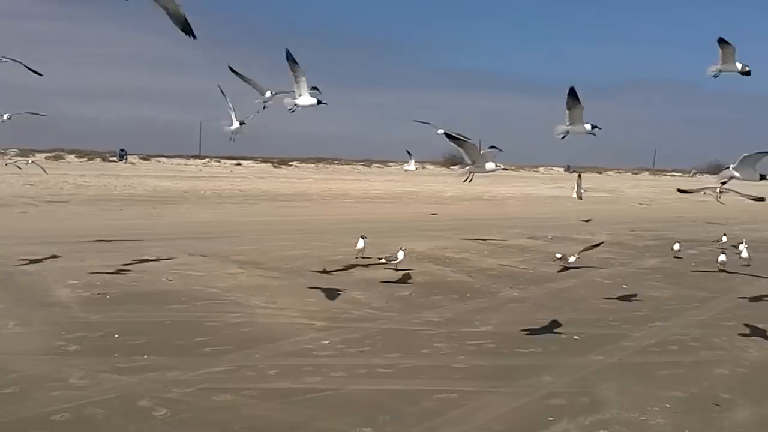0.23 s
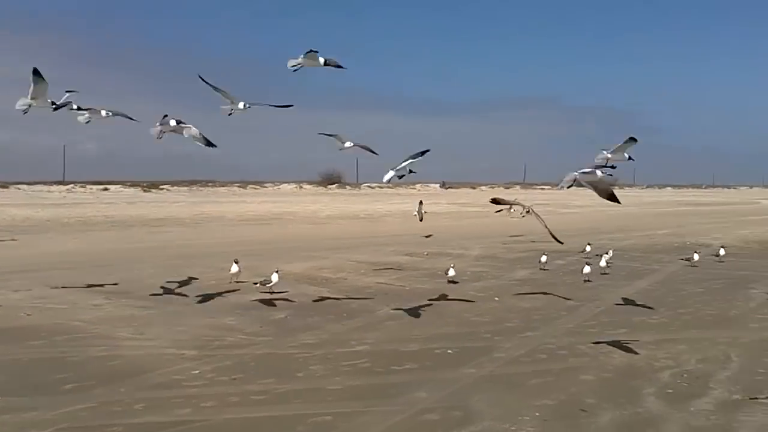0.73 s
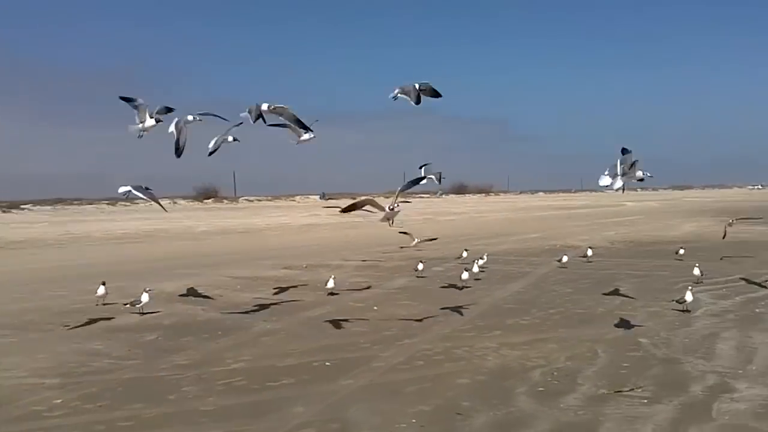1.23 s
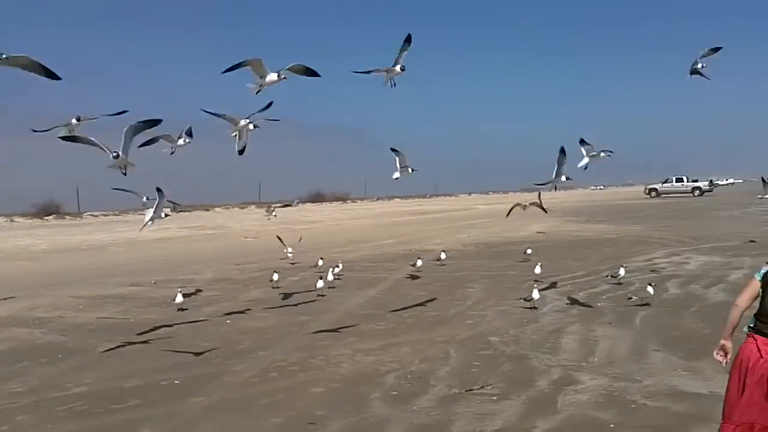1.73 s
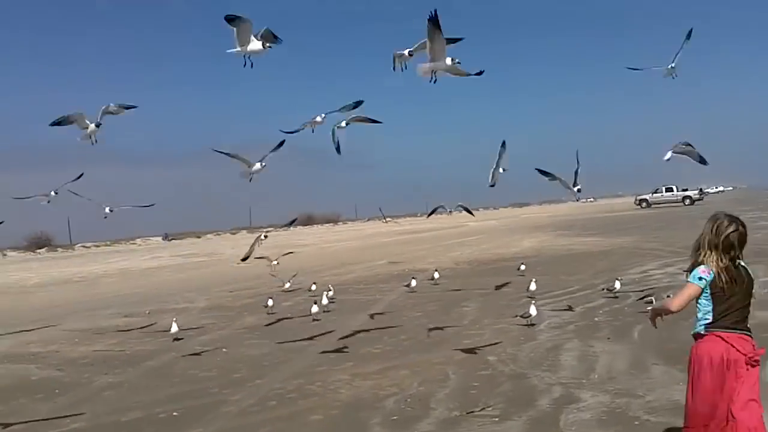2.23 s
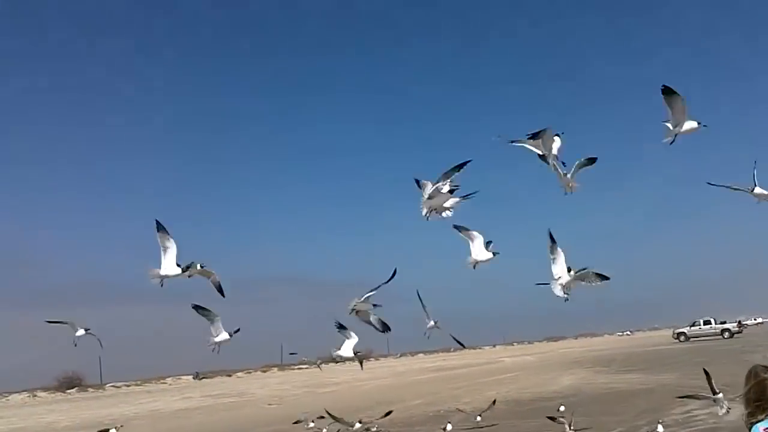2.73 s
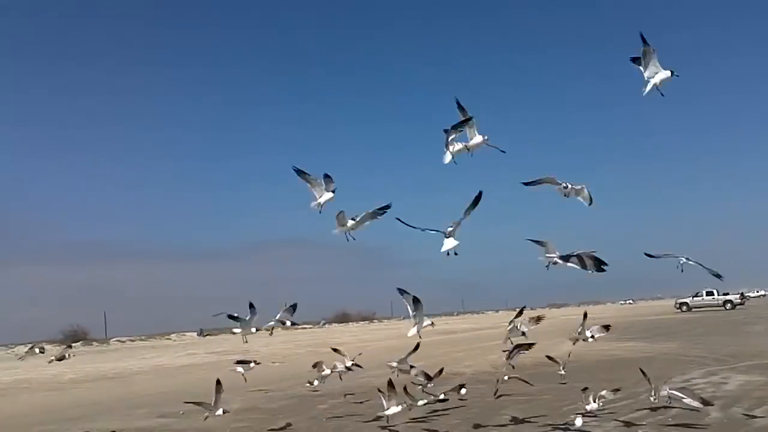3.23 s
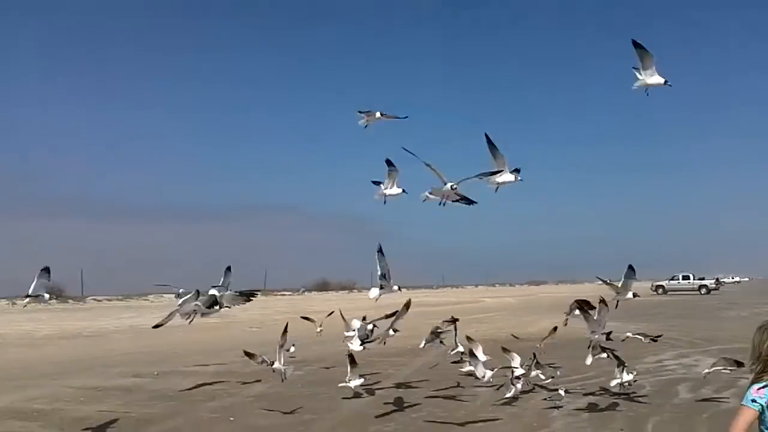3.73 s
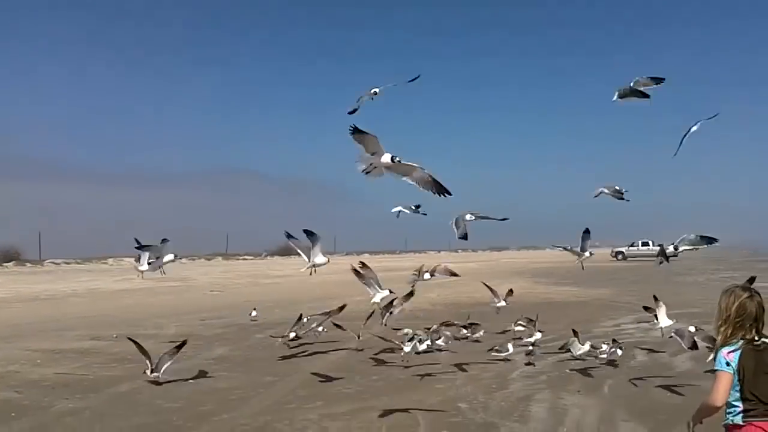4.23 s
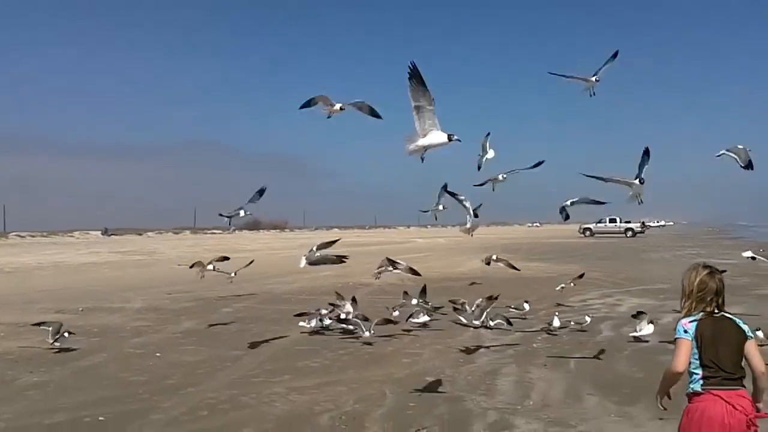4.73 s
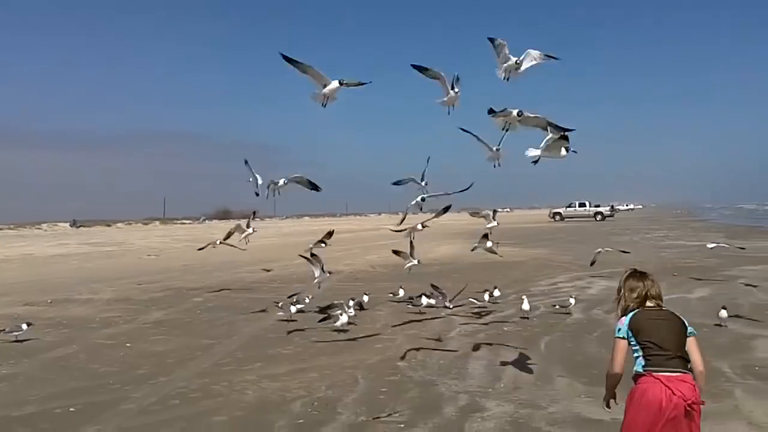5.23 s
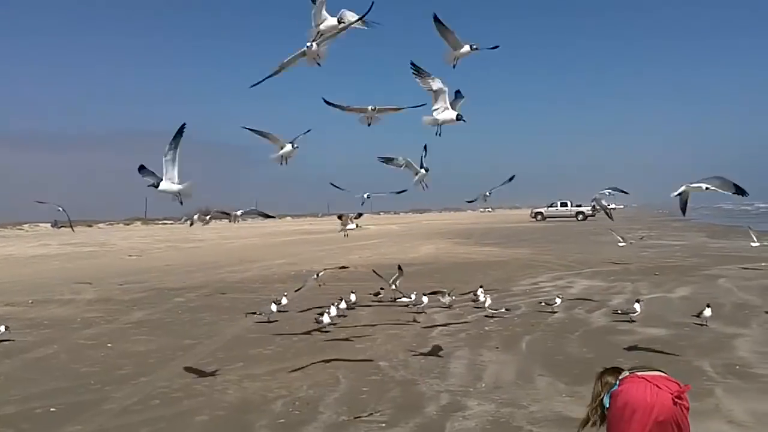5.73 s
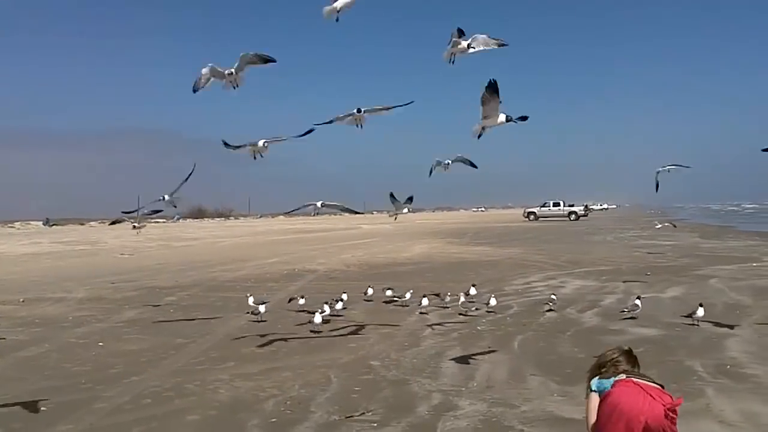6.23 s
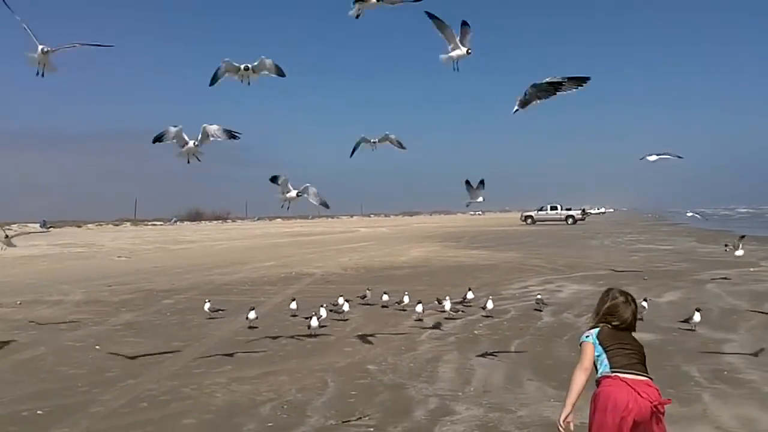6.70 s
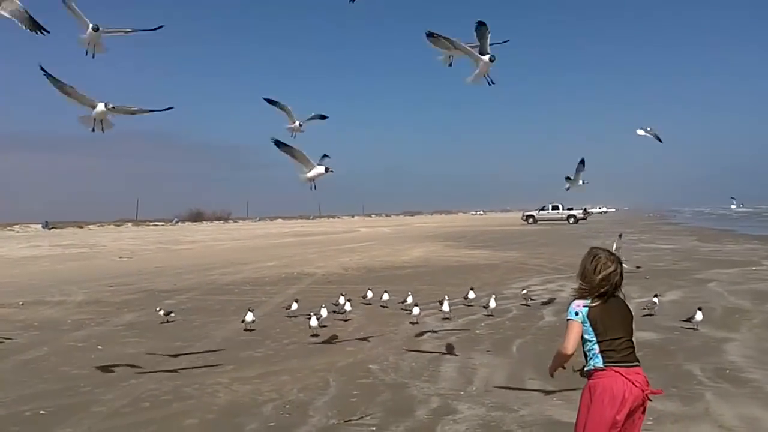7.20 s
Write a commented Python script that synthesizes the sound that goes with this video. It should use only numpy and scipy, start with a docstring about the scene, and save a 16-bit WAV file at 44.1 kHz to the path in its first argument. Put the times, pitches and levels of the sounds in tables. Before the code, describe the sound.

A windy open beach heard through a small handheld microphone with muffled, uneven treble. A smooth distant surf roar runs throughout, swelling very slightly. Low, lumpy wind buffeting is strongest around 0.4 s, stays heavy through the first second or so, then gradually weakens to the end. A single short falling gull cry sounds at 1.15 s, another faint one at 2.3 s and a weak high note at 2.5 s. From 2.6 to 4.5 s the flock erupts: rapid overlapping nasal yelps, raspy squawks and a longer wavering cry at 3.0-3.4 s, with a piercing squeal and thin whistles around 3.8-4.1 s. Brief airy wing swishes and tiny sharp ticks mix in near 2.9-3.8 s. Isolated higher calls come at 4.9-5.2 s. Then only surf and fading wind remain, with a soft swish at 5.4 s and small ticks at 5.8 and 7.4 s.

```python
"""Gulls above a windy beach

Gulls cry in overlapping bursts, each voice a sum of harmonics filtered by a throat; surf roars steadily far off.
Wind rumbles on the microphone and wings swish past: both, like the surf, are noise shaped in frequency and time.
The microphone's housing cuts narrow gaps in the treble."""
import sys
import numpy as np
from scipy import signal
from scipy.fft import rfft, irfft
from scipy.io import wavfile
from scipy.ndimage import uniform_filter1d, map_coordinates

SR = 44100
rng = np.random.default_rng(int(sys.argv[2]) if len(sys.argv) > 2 else 0)


def inscribe(sig):
    """Save sig as 16-bit PCM at rate SR to the path in sys.argv[1].

    A 1-D sig is mono; a 2-D sig holds one channel per row.
    Samples are clipped to [-1, 1] before scaling.
    """
    pcm = np.round(np.clip(np.atleast_2d(sig).T, -1, 1) * 32767)
    wavfile.write(sys.argv[1], SR, pcm.astype(np.int16))


def ratio_of_db(decibels):
    """Turn decibels (scalar or array-like) into linear amplitude factors; 0 dB maps to 1."""
    return 10 ** (np.asarray(decibels, float) / 20)


N = 328986  # samples


def evened(x):
    """Normalisation: scales a signal to rms 1."""
    return x / np.sqrt(np.mean(x ** 2) + 1e-20)


def read(points, hz):
    """Spectral envelope: joins (frequency, level) points by straight lines on a log frequency axis."""
    f, value = np.transpose(points)
    return np.interp(np.log(hz + 1), np.log(f + 1), value)


def drift(count, smooth):
    """Low-pass random process: white noise averaged twice over `smooth` steps, at rms 1."""
    size = max(int(smooth), 1)
    once = uniform_filter1d(rng.standard_normal(count), size)
    return evened(uniform_filter1d(once, size))


def frame_times():
    """Short-time analysis grid: times in seconds of the noise frames, 256 samples apart."""
    return np.arange(N // 256 + 5) * 256 / SR


def noise(spectrum, level_db, patchy_db):
    """Short-time spectral synthesis: random spectra, 0 dB = unit power per Hz, with drifting patches."""
    hz = np.fft.rfftfreq(1024, 1 / SR)
    real, imaginary, patches = rng.standard_normal((len(level_db), len(hz), 3)).T
    white = real + 1j * imaginary
    patches = uniform_filter1d(patches, size=14, axis=1)  # across frames
    patches = evened(uniform_filter1d(patches, size=12, axis=0))  # across frequency
    shaped = white * ratio_of_db(read(spectrum, hz)[:, None] + level_db + patchy_db * patches)
    flat = signal.istft(white, nperseg=1024, noverlap=768)[1]
    sound = signal.istft(shaped, nperseg=1024, noverlap=768)[1][:N]
    return sound / flat.std() * np.sqrt(SR / 2)


# spectrum of the surf in the air: pitch_hz [Hz], relative level_db [dB per Hz]
SURF_SPECTRUM = [(30, 15), (120, 16.5), (260, 18.5), (520, 11.5), (780, 9), (1030, 6.5), (1550, 3),
                 (2000, 1.1), (15000, -3.5)]
# slow swell of the surf: time_s [s], level_change_db [dB]
SURF_SWELL = [(0, -1.5), (3, -0.5), (7.46, 0.4)]


def surf():
    """Incoherent superposition: many distant breakers blend into a smooth roar."""
    t = frame_times()
    swell_db = np.interp(t, *np.transpose(SURF_SWELL))
    level_db = -76 + swell_db + 0.39 * drift(len(t), 27)
    return noise(SURF_SPECTRUM, level_db, patchy_db=0.44)


# spectrum of the wind rumble: pitch_hz [Hz], relative level_db [dB per Hz]
WIND_SPECTRUM = [(15, 0.8), (45, -6), (90, -9.5), (160, -17), (400, -21), (1000, -68)]
# gusts on the microphone: time_s [s], level_db [dB]
WIND_GUSTS = [(0.0, -29.5), (0.37, -24), (1.0, -30.5), (4.24, -41.5), (4.3, -36), (6.54, -41), (7.46, -46)]


def wind():
    """Turbulent pressure: lumpy low-frequency buffeting whose level follows the gusts."""
    lumps_db = 3.55 * drift(len(frame_times()), 5.1)
    rumble = evened(noise(WIND_SPECTRUM, lumps_db, patchy_db=1.5))
    return rumble * ratio_of_db(np.interp(np.arange(N) / SR, *np.transpose(WIND_GUSTS)))


# wing swishes: centre_s [s], length_s between 1/e points [s], level_db [dB]
WING_SWISHES = [(.92, .05, -40), (2.193, .08, -35), (2.89, .06, -26), (3.373, .05, -27), (3.48, .04, -28),
                (3.775, .06, -32), (5.422, 0.031, -29)]
# treble ticks, perhaps feathers snapping: centre_s [s], level_db [dB]
FEATHER_TICKS = [(.590, -33), (3.095, -18), (3.478, -16), (5.791, -27), (5.799, -22), (7.360, -22)]


def wings():
    """Aerodynamic noise: feathers cutting the air nearby hiss under Gaussian envelopes, with tiny ticks."""
    t = np.arange(N) / SR
    envelope = np.zeros(N)
    for centre_s, length_s, level_db in WING_SWISHES:
        envelope += ratio_of_db(level_db) * np.exp(-((t - centre_s) / (length_s / 2)) ** 2)
    for centre_s, level_db in FEATHER_TICKS:
        envelope += ratio_of_db(level_db) * np.exp(-((t - centre_s) / 0.00054) ** 2)
    feathers = [(3000, -13), (7000, -7), (10000, 1.0), (15000, 0.0)]  # Hz, relative dB per Hz
    return envelope * evened(noise(feathers, np.zeros(len(frame_times())), patchy_db=3.5))


# throat colours from shut to wide bill, one row each: level_db [dB] at each THROAT_BANDS pitch
THROAT_SHAPES = [(2, -9.5, -12, -2, -19, -10), (-15.5, 11, -17.5, -7.5, -6, -14),
                 (-3, -5, 2, 5.5, -12, -10), (-23, -24, -5, 0.5, -12, -10)]


def throat_colour(opening):
    """Variable vocal-tract filter: blends the throat colours by how wide the bill gapes (0-1)."""
    openings = np.linspace(0, 1, len(THROAT_SHAPES))
    return [np.interp(opening, openings, band_db) for band_db in np.transpose(THROAT_SHAPES)]


# bands in which the throat colours the voice: pitch_hz [Hz]
THROAT_BANDS = [1700, 3000, 4200, 5500, 6800, 10000]


def cry(rows, throat_db, hoarse):
    """Source and filter: syrinx harmonics through the throat; hoarseness shakes pitch and strength."""
    s, pitch_hz, effort_db = np.transpose(rows)
    t = np.arange(s[0], s[-1], 1 / SR)

    # pitch lies midway between smooth arcs and straight lines
    place = np.interp(t, s, np.arange(len(s)))
    arc = map_coordinates(pitch_hz, [place], order=2, mode="nearest")
    hz = uniform_filter1d((arc + np.interp(t, s, pitch_hz)) / 2, size=300, mode="nearest")
    effort_db = uniform_filter1d(np.interp(t, s, effort_db), size=200, mode="nearest")

    # fast glides break up, weak effort turns breathy
    glide = np.clip(abs(np.gradient(np.log(hz))) * SR / 30, 0, .5)
    slack_db = effort_db - effort_db.max()
    rough = hoarse + glide - slack_db / 80
    wobble = 1 + .003 * drift(len(t), 400) + .02 * rough * drift(len(t), 40)
    turns = np.cumsum(hz * wobble) / SR  # cycles of the fundamental

    low_bands = [(700, throat_db[0] - 30), (1300, throat_db[0] - 14.5)]
    throat = [*low_bands, *zip(THROAT_BANDS, throat_db), (15000, throat_db[-1] - 13)]
    voice = np.zeros(len(t))
    for k in range(1, int(15000 / hz.max()) + 1):
        dull_db = 0.26 * slack_db * np.log2(k * hz / 3500)  # weak effort loses treble first
        shimmer = 1 + .25 * drift(len(t), 1000) + rough * drift(len(t), 30)
        strength = shimmer * ratio_of_db(read(throat, k * hz) + dull_db)
        voice += strength * np.sin(2 * np.pi * (k * turns + rng.random()))
    edge = np.clip(np.minimum(t - s[0], s[-1] - t) / .012, 0, 1)  # 12 ms fades
    gulls_db = 4  # added to every effort
    return voice * ratio_of_db(effort_db + gulls_db) * np.sin(edge * np.pi / 2)


def arch(start, length, top_hz, top_db, kind):
    """Pitch contour: a rise to the top, then a mostly late sag; effort goes from onset level to fade."""
    # squawks and whistles start at full strength
    rise, lift, sag_per_s, late, onset_db, fade_db = kind
    sag = sag_per_s * length
    early = 1 - np.clip(late, 0, 1)
    return [(start, top_hz * (1 - lift), top_db + onset_db),
            (start + rise * length, top_hz, top_db),
            (start + (1 + rise) / 2 * length, top_hz * (1 - early * sag), top_db + early * fade_db),
            (start + length, top_hz * (1 - sag), top_db + fade_db)]


# cries with a drawn pitch curve, short or long, some warbling: throat_db [dB at each THROAT_BANDS pitch],
# then a curve of time_s [s], pitch_hz [Hz], effort_db [relative dB]
DRAWN_CRIES = [ ((0, -4.5, 3.5, 1, -0.5, 1), [(1.145, 884, -48), (1.165, 1091, -34.5), (1.2, 1086, -33.5),
               (1.24, 1020, -41), (1.35, 795, -52)]), ((1, -18, -10.5, -2, -14, -7.5), [(2.293, 861, -61),
               (2.325, 903, -39), (2.333, 1075, -33.5), (2.39, 1090, -30.5), (2.43, 1020, -34),
               (2.475, 850, -53)]), ((-15.5, 1, -20, -5.5, -14, -15.5), [(2.615, 682, -27.5),
               (2.643, 841, -29.5), (2.67, 743, -23), (2.69, 709, -26.5), (2.715, 724, -25),
               (2.762, 670, -29.5), (2.79, 724, -35)]), ((-12, -5, 2, -4, -6, -6), [(2.785, 882, -40),
               (2.795, 940, -25), (2.84, 943, -31.5), (2.865, 863, -34.5), (2.885, 932, -27.5),
               (2.91, 896, -32), (2.94, 760, -60)]), ((-9, -1, -4, -4, -8.5, -23), [(2.978, 966, -23),
               (2.995, 1080, -26), (3.04, 1053, -21), (3.1, 1087, -27.5), (3.18, 1114, -23.5),
               (3.25, 1043, -25), (3.3, 1071, -26.5), (3.35, 1057, -28.5), (3.39, 997, -41)]),
               ((-8, -14, -12.5, 2.5, -1, -24), [(3.63, 947, -32), (3.65, 1054, -24.5), (3.68, 962, -31.5),
               (3.7, 867, -43), (3.77, 783, -41)]), ((-24, -25, -9.5, 3.5, -9, -14), [(3.715, 498, -34),
               (3.733, 537, -28.5), (3.75, 566, -24), (3.78, 508, -31), (3.797, 503, -36),
               (3.815, 450, -36)]), ((-25, -12, 5.5, -2, -10, -8), [(4.135, 914, -27), (4.158, 997, -29),
               (4.168, 1078, -22.5), (4.19, 1025, -28), (4.207, 960, -23)]),
               ((-2, -18.5, -4, 1.5, -4.5, -23), [(3.825, 2930, -33), (3.86, 3290, -22),
               (3.92, 2953, -27.5), (3.97, 3070, -26), (4.0, 2910, -32)]), ((-6, -0.5, -3, -20, -11, -11),
               [(4.06, 605, -36), (4.08, 695, -31.5), (4.105, 638, -35), (4.13, 667, -31.5),
               (4.158, 746, -29), (4.2, 617, -43)]), ((-4.5, -6.5, -6, 2, -5, -2), [(4.27, 978, -40),
               (4.285, 987, -22), (4.3, 950, -33), (4.32, 1005, -27), (4.34, 954, -28), (4.35, 840, -48)]),
               ((-3, -3, 1, -6, -14, -10), [(4.36, 856, -36), (4.375, 974, -27), (4.39, 945, -24.5),
               (4.405, 873, -42), (4.42, 895, -30), (4.437, 1016, -24), (4.455, 934, -29),
               (4.505, 733, -49)]), ]
# the next four tables share: start_s [s], length_s [s], top_pitch_hz [Hz], effort_db [relative dB],
# bill_opening [0-1]
# clear yelps
CLEAR_YELPS = [(2.742, 0.078, 858, -27, 0.56), (2.81, 0.049, 1008, -21.5, 0.57),
               (3.095, 0.042, 975, -22.5, 0.74), (4.205, .072, 862, -25.5, 0.77),
               (4.92, 0.074, 1440, -34.5, 0.72)]
# raspy squawks of squabbling birds
RASPY_SQUAWKS = [(2.865, .11, 787, -32.5, 0.03), (3.015, .04, 626, -34, 0.06), (3.075, .03, 894, -26, 0.52),
                 (3.222, 0.045, 975, -33, 0.75), (3.26, .085, 710, -31, 0.02),
                 (3.355, .07, 917, -26.5, .05), (3.41, 0.055, 712, -32, 0.14), (3.41, 0.089, 828, -37, 0.2),
                 (4.125, .035, 933, -34, .85), (4.24, 0.047, 757, -29, 0.07), (4.3, 0.077, 812, -33, 0.01),
                 (4.355, 0.098, 760, -34, 0)]
# held notes, nearly level in pitch
HELD_NOTES = [(2.48, 0.11, 2310, -48.5, 0.64), (3.135, 0.12, 853, -26, 0.17), (4.36, 0.1385, 858, -32, .02),
              (5.09, 0.12, 1672, -35.5, 0.44)]
# thin whistles that climb almost to the end
CLIMBING_WHISTLES = [(3.868, .047, 1346, -32.5, 0.74), (3.905, .09, 3510, -36.5, 0.2),
                     (4.02, .06, 4000, -38, 0.78), (5.06, .055, 4730, -40, .8)]
# pitch and effort arch of each kind: rise [share of length], lift [share of pitch], sag [share per s],
# late [share of sag], onset_db [dB], fade_db [dB]
YELP_ARCH = (.4, .1, 1.5, .7, -8, -10)
SQUAWK_ARCH = .38, .07, 2.5, 0.8, 0, -5
HOLD_ARCH = (.2, .05, .55, .9, -5, -7)
CLIMB_ARCH = (.85, .06, .1, .6, 0.4, -3)


def flock():
    """Linear superposition: every drawn cry, yelp, squawk, held note and whistle adds in its place."""
    clear, rasp = .12, .42  # hoarseness
    calls = [(rows, throat_db, clear) for throat_db, rows in DRAWN_CRIES]
    for table, kind, hoarse in [(CLEAR_YELPS, YELP_ARCH, clear), (RASPY_SQUAWKS, SQUAWK_ARCH, rasp),
                                (HELD_NOTES, HOLD_ARCH, clear), (CLIMBING_WHISTLES, CLIMB_ARCH, clear)]:
        for *contour, opening in table:
            calls.append((arch(*contour, kind), throat_colour(opening), hoarse))
    gulls = np.zeros(N)
    for rows, throat_db, hoarse in calls:
        at = round(rows[0][0] * SR)
        sound = cry(rows, throat_db, hoarse)
        gulls[at:at + len(sound)] += sound
    return gulls


def scene():
    """Reflection and superposition: gulls with a faint bounce off the sand, over surf, wind and wings."""
    gulls = flock()
    bounce = ratio_of_db(-20) * np.roll(gulls, 300)  # 300 samples, about 7 ms late
    return (gulls + bounce + surf() + wind() + wings())[None]


# microphone colour: pitch_hz [Hz], level_db [dB]
MIC_COLOUR = [(2000, .5), (2900, -2.5), (3500, -2), (4900, -3), (5200, -12.5), (5900, -11.5), (6700, -15),
              (7300, -25.5), (8500, -28.5), (9300, -24.5), (10300, -28), (12400, -32), (15100, -30),
              (15500, -55)]
# centres of the housing's gaps: pitch_hz [Hz]
GAP_CENTRES = [2700, 5490, 7885, 10940]
# shape of each gap: half_width_hz [Hz], depth_db [dB]
GAP_SHAPES = [(480, -33), (300, -26), (450, -16), (450, -36)]


def microphone(dry):
    """Filtering and interference: microphone colour, with gaps where paths through the housing cancel."""
    hz = np.fft.rfftfreq(N, 1 / SR)
    colour = ratio_of_db(read(MIC_COLOUR, hz))
    for gap_hz, (half_width_hz, depth_db) in zip(GAP_CENTRES, GAP_SHAPES):
        off = ((hz - gap_hz) / half_width_hz) ** 2
        colour = colour * np.sqrt((off + ratio_of_db(depth_db) ** 2) / (off + 1))
    return irfft(rfft(dry, axis=1) * colour, N, axis=1)


def roll_off(x):
    """The treble ends steeply here."""
    return signal.sosfilt(signal.butter(12, 15250, fs=SR, output="sos"), x)


def record(dry):
    """Transduction: the scene as the microphone hears it."""
    mix = microphone(dry)
    return roll_off(mix)


dry = scene()
out = record(dry)
inscribe(out)
```